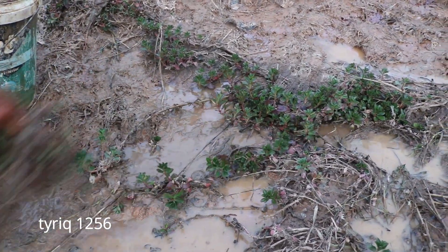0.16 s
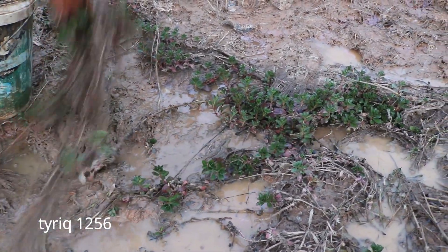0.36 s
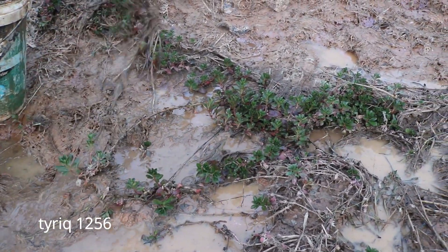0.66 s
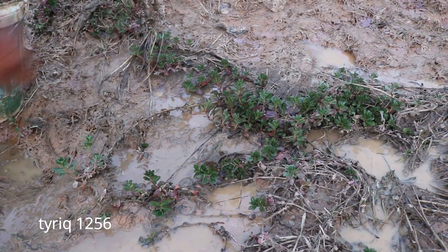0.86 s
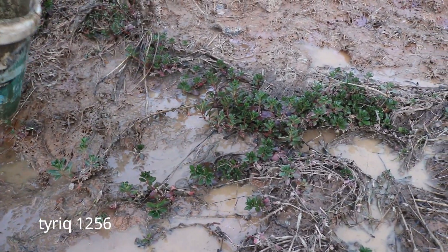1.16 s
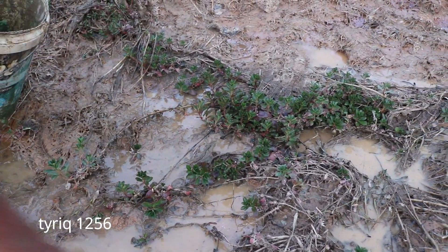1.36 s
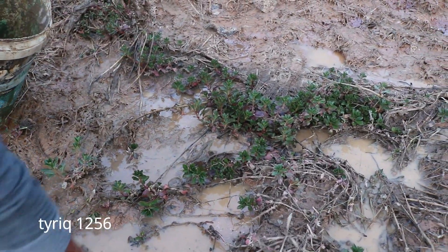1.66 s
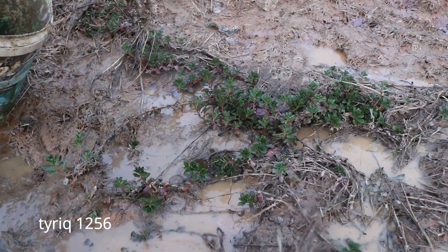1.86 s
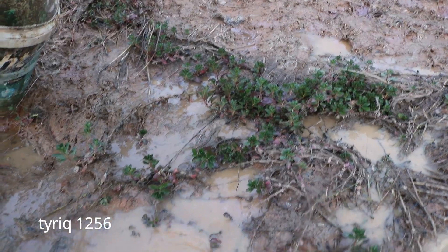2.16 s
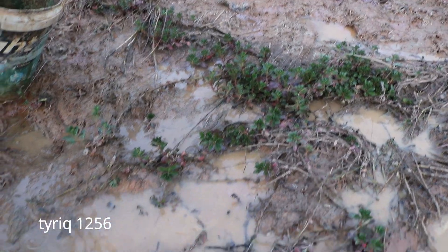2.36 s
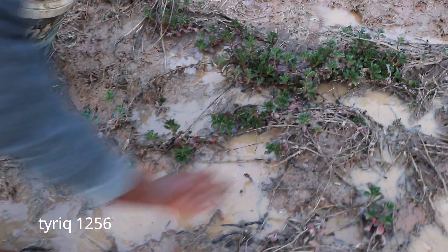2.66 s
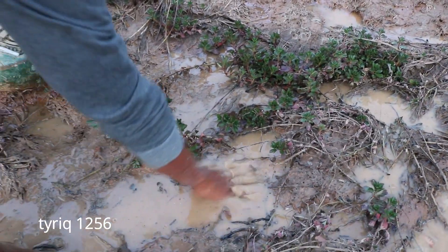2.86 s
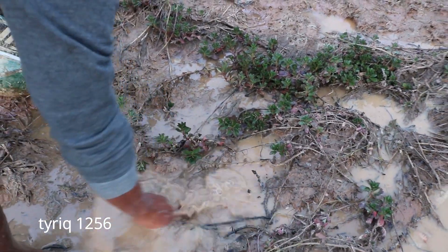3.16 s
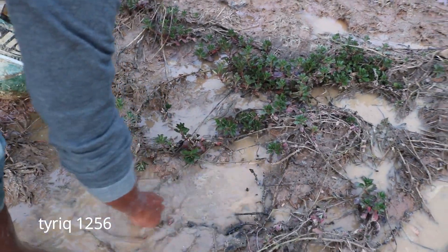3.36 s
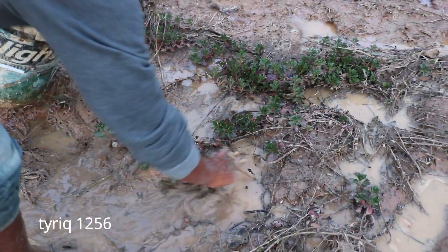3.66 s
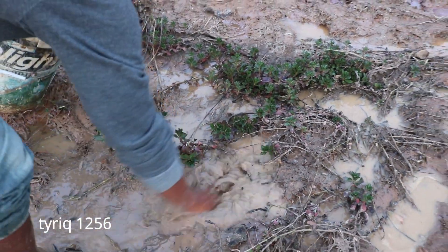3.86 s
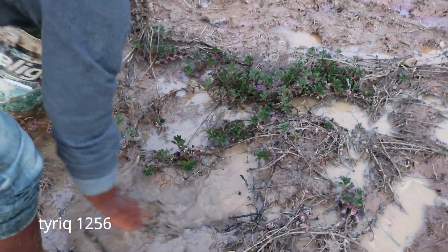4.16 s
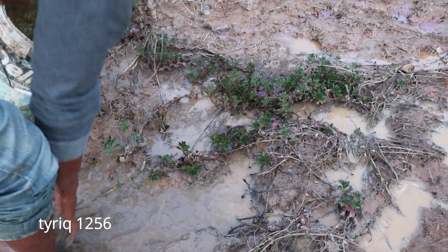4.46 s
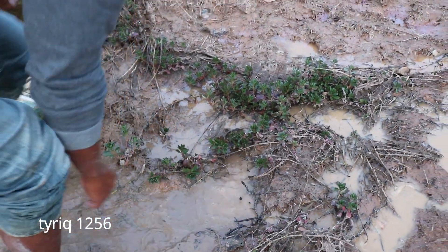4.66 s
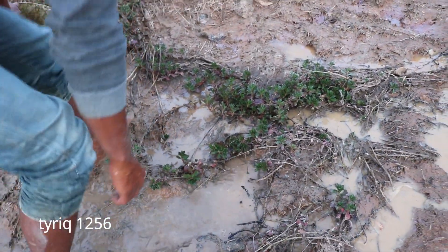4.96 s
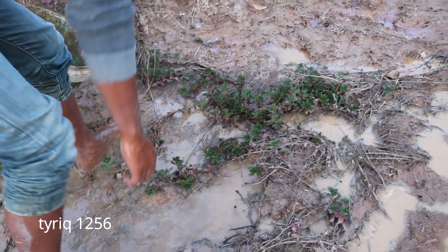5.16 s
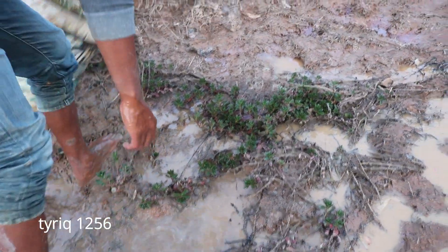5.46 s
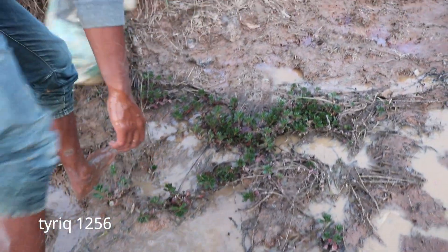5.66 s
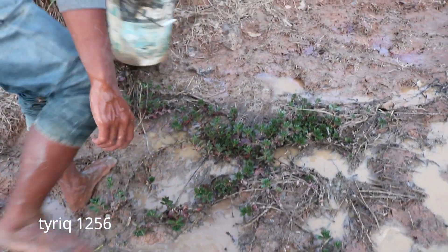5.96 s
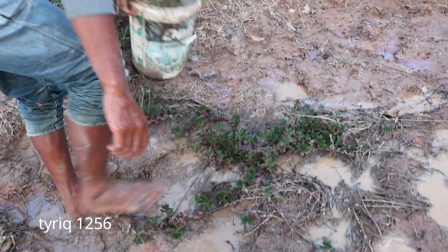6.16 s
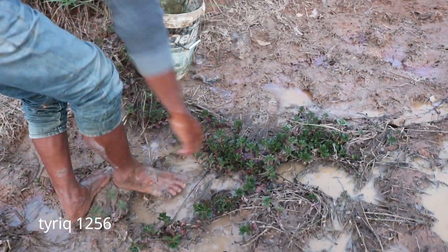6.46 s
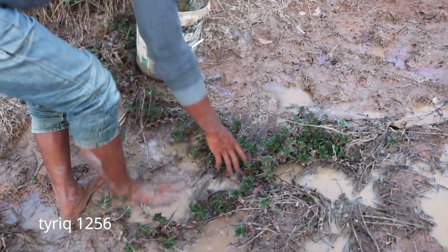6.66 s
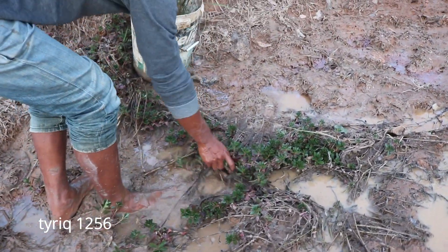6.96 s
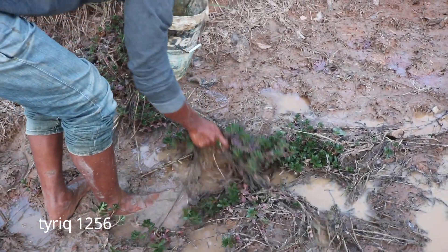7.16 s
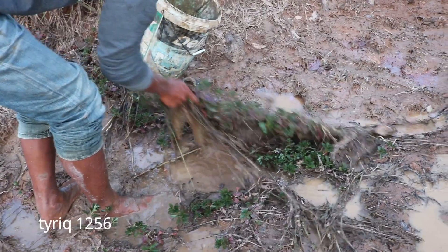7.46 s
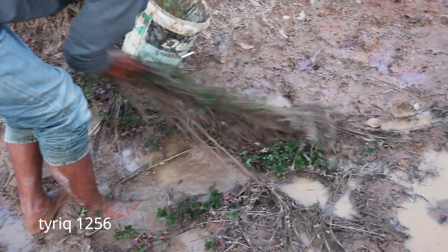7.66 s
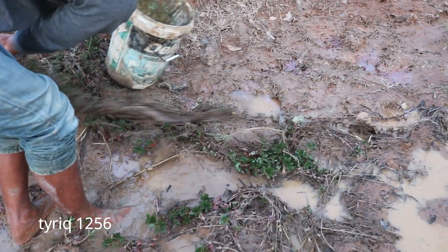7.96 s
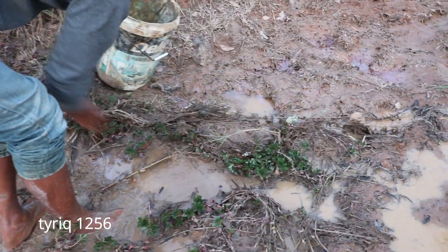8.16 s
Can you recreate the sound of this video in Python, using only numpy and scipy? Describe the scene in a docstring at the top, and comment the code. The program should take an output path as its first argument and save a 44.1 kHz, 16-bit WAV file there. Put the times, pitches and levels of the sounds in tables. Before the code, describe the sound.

Close muddy weed-pulling: rustling stems, sharp snaps, watery swishing and plops, a brief plastic bucket knock, faint distant birds and insect.

```python
"""In a muddy field someone pulls clumps of weeds, rinses a hand in a puddle and steps barefoot through the mud.
Stems rustle and snap, wet clumps slap down and water sloshes: swarms of tiny rings, and filtered noise for frays.
Bubbles are single short rings, often rising in pitch; a plastic bucket, knocked three times in quick succession,
is a sum of fading tones. A light breeze of low noise bumps the microphone.
Two birds (fluttering tones) and an insect (pulsed narrow noise) call far away."""
import sys
import numpy as np
from scipy import signal
from scipy.fft import rfft, irfft, next_fast_len
from scipy.io import wavfile
from scipy.ndimage import uniform_filter1d

SR = 44100
rng = np.random.default_rng(int(sys.argv[2]) if len(sys.argv) > 2 else 0)


def file_out(sig):
    """Save sig as 16-bit WAV at sys.argv[1]."""
    # one column per channel
    cols = np.atleast_2d(sig).T
    # limit, then scale
    lim = np.clip(cols, -1, 1)
    pcm = np.round(lim * 32767).astype(np.int16)
    wavfile.write(sys.argv[1], SR, pcm)


N = 366030
TIME = np.arange(N) / SR  # [s]

# slaps of wet weeds, strokes of the hand in the puddle and steps in mud:
# (time [s], rise [s], fall [s], level [dB], wetness [0 = damp weeds, 1 = open puddle])
SPLASH_EVENTS = [(0, 0.014, 0.03, -30, 0.3), (.051, 0.0052, 0.041, -40.5, 0.034),
                 (0.344, 0.0016, 0.017, -37, 0.039), (.514, 0.0037, 0.039, -43.5, 0.43),
                 (.81, 0.037, 0.035, -42, 0.77), (1.035, 0.01, .03, -37, 0.13),
                 (1.068, 0.0039, 0.074, -41, 0.55), (1.666, 0.0067, 0.034, -41, 0.86),
                 (1.7, .003, 0.04, -43.5, 0.75), (2.058, .002, 0.016, -36, 0.55),
                 (2.448, 0.025, 0.027, -41, 0.2), (2.511, 0.054, 0.0098, -34, 0.12),
                 (2.91, 0.0045, 0.062, -35.5, 0.94), (2.974, 0.036, 0.059, -36, 0.84),
                 (3.06, 0.012, 0.052, -41.5, 0.52), (3.17, 0.012, 0.065, -47, 0.7),
                 (3.232, 0.0041, 0.14, -53, 0.46), (3.533, .015, 0.099, -36.5, 0.97),
                 (3.631, 0.0076, 0.057, -47.5, 0.45), (3.715, 0.056, .09, -33.5, 0.76),
                 (3.831, 0.099, 0.096, -40.5, 0.65), (3.96, 0.057, 0.14, -38, 1),
                 (4.138, 0.018, 0.04, -45.5, 0.73), (4.214, 0.0042, .1, -54, 0.58),
                 (4.342, 0.014, 0.12, -46.5, 0.8), (4.515, 0.0022, 0.058, -43.5, 0.24),
                 (4.563, .021, 0.048, -34, 0.2), (4.639, 0.0082, 0.2, -50.5, 0.57),
                 (4.927, 0.0046, 0.023, -32, 0.47), (4.94, 0.0051, 0.074, -42, 0.82),
                 (5.111, 0.051, 0.029, -44, 0.95), (6.09, .11, 0.048, -45, 0.91),
                 (6.28, 0.039, 0.21, -54.5, 0.89), (6.376, .026, 0.014, -29.5, 0.49),
                 (6.659, 0.07, .25, -50, 0.9), (7.766, 0.026, 0.019, -37.5, 0.74),
                 (7.96, 0.017, 0.017, -37.5, 0.57), (8.231, 0.0043, 0.044, -35, 0.25),
                 (8.261, 0.014, .012, -29, 0.07)]
# dragging weeds, one list a pull: (time [s], base level [dB])
WEED_PULLS = [
    [(.1, -57.5), (.31, -42.5), (.45, -36), (.66, -46.5), (.774, -38.5), (1.0, -57.5)],
    [(1.55, -54), (1.858, -45.5), (2.008, -39.5), (2.176, -46.5), (2.38, -57.5), (2.45, -41)],
    [(6.5, -54), (7.37, -43), (7.58, -40), (7.76, -37), (7.85, -40.5), (8.0, -41), (8.22, -78)],
]
# where each pull is heard: (side [0 = straight ahead, positive = left])
WEED_PULL_SIDES = [0.95, -0.3, -0.27]
# how alike left and right are in the open field: (frequency [Hz], coherence [0 to 1])
FIELD_LIKENESS = [(100, 0.94), (800, 0.5), (2200, 0.33), (4500, 0.14), (9000, 0.028), (16000, 0.036)]
# sounds close by are mostly more alike in both ports: (frequency [Hz], coherence [0 to 1])
NEAR_LIKENESS = [(100, 1), (700, 0.96), (1300, 1), (2400, 0.62), (4500, 0.74), (9000, 0.18), (16000, 0.061)]


def amp(db):
    """Decibels to gain."""
    return 10 ** (np.asarray(db) / 20)


def unit(x):
    """Scales a sound to an average strength (rms) of 1."""
    return x / np.sqrt(np.mean(x ** 2) + 1e-20)


def read(points, hz):
    """Reads a table between its points, on a log-frequency axis."""
    f, value = np.transpose(points)
    return np.interp(np.log(hz + 1), np.log(f + 1), value)


def add(mix, s, sound):
    """Mixes a stereo sound in at time s."""
    start = max(round(s * SR), 0)
    part = mix[:, start:][:, :sound.shape[1]]
    part += sound[:, :part.shape[1]]


def shape(x, response):
    """Filters a sound by a function of frequency."""
    size = next_fast_len(x.shape[-1] + 512)
    spectrum = rfft(x, size) * response(np.fft.rfftfreq(size, 1 / SR))
    return irfft(spectrum, size)[..., :x.shape[-1]]


def colour(x, points):
    """Filters x by a table of (frequency [Hz], level [dB]) and scales it to rms 1."""
    return unit(shape(x, lambda hz: amp(read(points, hz))))


def spread(pair, likeness=FIELD_LIKENESS):
    """Two unrelated signals become one wide source: a shared middle plus a part opposite on each side."""
    angle = lambda hz: np.arccos(np.clip(read(likeness, hz), 0, 1)) / 2
    middle = shape(pair[0], lambda hz: np.cos(angle(hz)))
    sides = shape(pair[1], lambda hz: np.sin(angle(hz)))
    return middle + np.array([[1], [-1]]) * sides


def place(x, side, lead_s=.00008, shadow_db=3):
    """The nearer port hears a source earlier and brighter."""
    ear = np.array([[side], [-side]])

    def path(hz):
        lead = np.exp(2j * np.pi * hz * ear * lead_s)
        return lead * amp(ear * shadow_db * np.minimum(hz / 9000, 1) ** 2)
    return shape(x, path)


def side_at(s):
    """Where the hands and feet are at work at time s."""
    # place of the work: (time [s], side [0 = straight ahead, positive = left])
    work_path = [(0, 1.16), (1.1, 0.8), (1.7, .3), (2.1, 0.23), (2.55, 1.33), (2.9, 0.27), (3.25, -0.38),
                 (3.55, -0.2), (4.1, 0.41), (4.45, 0.23), (4.6, 1.17), (4.93, 0.24), (5.7, 0.55),
                 (6.4, 0.28), (6.7, 0.65), (7.1, -0.52), (7.8, -0.61), (8.25, 1.2)]
    return np.interp(s, *np.transpose(work_path))


def clumps(depth_db, size=400):
    """A gain that flutters every few milliseconds, as droplets and contacts come in bunches."""
    smooth = uniform_filter1d(rng.standard_normal(N), size)
    return amp(depth_db * unit(smooth))


def ring(hz, life, rise):
    """A bubble swells and dies; as it nears the surface its pitch climbs towards about an octave up."""
    t = np.arange(int(4 * life * SR) + 128) / SR
    pitch = hz * (1 + 1.25 * np.tanh(rise * t / 1.1))
    envelope = np.sqrt(t / life) * np.exp(-(t / life) ** 1.5)
    return envelope * np.sin(2 * np.pi * np.cumsum(pitch) / SR)


def grains(per_s, cycles, size_db, count=26, size=N // 3):
    """Two even-spectrum swarms of tiny rings of uneven size, looped; the small high ones are more frequent."""
    out = np.zeros((2, size))
    for hz in np.geomspace(330, 15000, count):
        chance = rng.random((2, size))
        strength = np.minimum(rng.exponential(1, 8192), 4)
        hits = chance < per_s / count * np.sqrt(hz / 3000) / SR
        kicks = amp(size_db * strength) * rng.choice([-1, 1], 8192)
        train = np.zeros((2, size))
        train[hits] = np.resize(kicks, hits.sum())
        life = cycles / hz * min(1, (2500 / hz) ** 0.35)
        grain = ring(hz, life, 0.086 / life)
        rings = signal.oaconvolve(train, grain[None], axes=1)[:, :size]
        out += np.sqrt(hz) * unit(rings)
    return unit(out)[:, np.arange(N) % size]


def splashes(fall_db=13, foot=0.56, bunch_db=2.6):
    """Each splash is a burst of droplets: open water gurgles with bubbles, wet weeds and mud crackle."""
    # more water means more low gurgle: (level on damp weeds [dB], level in the open puddle [dB])
    gurgle_range = (-35, 5)
    # and less bright spray: (level on damp weeds [dB], level in the open puddle [dB])
    spray_range = (-2.5, -16)
    water = spread(grains(per_s=2000, cycles=3.5, size_db=4.5), NEAR_LIKENESS)
    crackle = spread(grains(per_s=7000, cycles=1.5, size_db=4.5), NEAR_LIKENESS)
    water = water * clumps(bunch_db)
    out = np.zeros((2, N))
    for s, rise, fall, db, wetness in SPLASH_EVENTS:
        t = np.arange(int((rise + 2 * fall) * SR)) / SR
        at = (round(s * SR) + np.arange(len(t))) % N
        gurgle = np.interp(wetness, [0, 1], gurgle_range)
        spray = np.interp(wetness, [0, 1], spray_range)
        wet = np.clip(wetness, .05, .95) ** 0.86
        growing = foot + (1 - foot) * (t / rise) ** 2
        fading = amp(-fall_db * (t - rise) / fall)
        swell = np.where(t < rise, growing, fading)
        body = max(gurgle, -13)
        tone = [(130, body - 16), (380, body - 11), (600, body), (1400, body / 2 + 2),
                (2600, 0), (5000, spray / 2 - 1), (8000, spray), (15500, spray - 10)]
        droplets = np.sqrt(wet) * water[:, at] + np.sqrt(1 - wet) * crackle[:, at]
        burst = colour(droplets, tone) * swell
        stretch = np.sqrt(len(t) / SR / (rise + fall))  # makes up for the quiet tail
        add(out, s, place(unit(burst) * amp(db) * stretch, side_at(s)))
    return out


def rustle(level_db=2, flutter_db=1.76):
    """Countless leaf and stem contacts, in uneven clumps, as the weeds are dragged."""
    # tone of the leaves: (frequency [Hz], level [dB])
    leaf_tone = [(290, -66), (500, -12), (740, -10.5), (1670, -2), (1820, -0.5), (1980, -7.5), (2160, -2),
                 (6230, -3), (12000, -8.5), (14900, -10.5), (16000, -29)]
    contacts = grains(per_s=16000, cycles=1.3, size_db=4.4)
    swarm = colour(spread(contacts), leaf_tone)
    swarm = unit(swarm * clumps(flutter_db))
    out = np.zeros((2, N))
    for pull, side in zip(WEED_PULLS, WEED_PULL_SIDES):
        s, db = np.transpose(pull)
        during = (TIME >= s[0]) & (TIME <= s[-1])
        effort = amp(np.interp(TIME[during], s, db) + level_db)
        effort = effort * signal.windows.tukey(during.sum(), .06)  # soft start and end
        add(out, s[0], place(swarm[:, during] * effort, side))
    return out


def fibres(per_s=95, over_db=8, size_db=6.5):
    """Single roots and stems give way while a clump is dragged; the harder the pull, the louder."""
    out = np.zeros((2, N))
    for pull, side in zip(WEED_PULLS, WEED_PULL_SIDES):
        s, db = np.transpose(pull)
        length = s[-1] - s[0]
        for when, pitch, size, stray in rng.random((300, 4))[:int(per_s * length)]:
            at = s[0] + when * length
            hz = 2300 * 4 ** pitch
            level = np.interp(at, s, db) + over_db + size_db * min(-np.log(size), 3)
            tick = amp(level) * ring(hz, 1.7 / hz, 0)
            add(out, at, place(tick, side + stray - .5))
    return out


def snaps(crack_s=0.00028, fray_level=0.45, fray_s=0.0015, octaves=0.22):
    """A sharp crack, then a short fray of fibres."""
    # the loudest stems snapping and drops ticking: (time [s], level [dB], centre [Hz])
    snap_events = [(0.0157, -17.5, 5350), (.858, -23.5, 4530), (0.986, -35, 7600), (1.053, -24.5, 4530),
                   (1.3842, -38.5, 5640), (2.0603, -24, 3020), (2.338, -40, 7980), (2.3497, -36.5, 6800),
                   (2.465, -20.5, 4500), (2.47, -26, 5730), (3.0344, -24.5, 5700), (3.0613, -24.5, 4100),
                   (3.1494, -28, 7850), (3.384, -37, 3350), (4.5805, -21.3, 4860), (5.6377, -33.5, 7500),
                   (5.6904, -32, 3200), (5.743, -35, 6840), (6.1979, -32.5, 1390), (6.357, -38.5, 7200),
                   (6.5529, -28, 2600), (7.1995, -20.5, 3500), (7.7247, -29.5, 6220), (7.784, -25, 6230),
                   (7.894, -32, 6550), (8.248, -27, 3520), (8.2725, -18, 3830)]
    out = np.zeros((2, N))
    t = np.arange(600) / SR
    for s, db, hz in snap_events:
        crack = np.exp(-t / crack_s) * np.sin(2 * np.pi * hz * t)
        hiss = rng.standard_normal((2, len(t)))
        fray = unit(shape(hiss, lambda f: 1 / (1 + (np.log2((f + 1) / hz) / octaves / 2) ** 2)))
        snap = crack + fray_level * fray * np.exp(-t / fray_s)
        start_strength = snap[:, :110].std()
        add(out, s, place(amp(db) * snap / start_strength, side_at(s)))
    return out


def bubbles():
    """The larger bubbles, each a pop or a plop, many of them rising in pitch."""
    # larger air pockets ringing in water and mud:
    # (time [s], level [dB], starting pitch [Hz], life [s], relative pitch rise [about 1/s])
    air_pockets = [(0.0107, -9, 2050, 0.00087, 0), (0.0968, -24.5, 1430, 0.0035, 41),
                   (.125, -22.5, 3400, .0017, 0), (0.27, -13, 2670, 0.0029, 25),
                   (.8181, -27.5, 730, 0.0058, 3), (1.0434, -6, 2900, 0.0013, -2),
                   (1.0886, -14, 3180, 0.0023, 4), (1.1895, -14.5, 874, 0.01, 67),
                   (1.6577, -8.5, 3060, 0.00066, 0), (1.6665, -18.5, 1200, 0.0042, -8),
                   (2.1271, -24.5, 1140, 0.0072, 25), (2.9163, -5.5, 2660, 0.0012, 18),
                   (2.979, -9.5, 2850, .001, 0), (2.993, -20, 1355, 0.013, 45),
                   (3.0263, -24, 533, 0.0061, 1), (3.185, -25.5, 3100, 0.0018, 39),
                   (3.236, -15, 1590, 0.0013, -2), (3.2638, -16, 1360, .003, 5),
                   (3.557, -17, 1140, .0084, 13), (3.6347, -17.5, 1107, .0087, 15),
                   (3.698, -16.5, 1824, 0.0061, 1), (3.7837, -12.5, 1090, 0.00071, 0),
                   (3.791, -15.5, 1730, .0011, 0), (3.844, -10.5, 3020, 0.0012, -3),
                   (3.9328, -2.5, 4714, 0.00092, 0), (4.007, -18, 370, 0.0082, 27),
                   (4.0173, -10, 2250, 0.00063, 28), (4.0596, -20, 1274, 0.0087, 7),
                   (4.0684, -20.5, 735, 0.0043, 21), (4.1377, -25.5, 770, 0.0052, -4),
                   (4.177, -15.5, 3060, 0.0015, 45), (4.2188, -26.5, 1170, 0.0059, 13),
                   (4.3014, -19, 1700, 0.00096, 35), (4.3679, -33, 489, 0.026, 25),
                   (4.422, -26.5, 1490, 0.0026, 47), (4.4504, -27, 1990, 0.0018, 0),
                   (4.5185, -18, 1630, 0.0076, 29), (4.663, -23.8, 2010, 0.0022, 8),
                   (6.296, -35.5, 612, 0.027, 4), (6.686, -10, 2200, 0.0014, 61),
                   (6.7362, -25, 2280, 0.0026, 0), (6.7787, -31, 1240, 0.0053, -1),
                   (6.9307, -22.5, 1160, 0.0012, 48), (7.008, -20, 1210, 0.0049, 65),
                   (7.797, -9, 3940, .002, 0)]
    out = np.zeros((2, N))
    for s, db, hz, life, rise in air_pockets:
        add(out, s, place(amp(db) * ring(hz, life, rise), side_at(s)))
    return out


def plops(per_s=120, over_db=10.5, fade_db=5, uneven_db=8, life_cycles=3.9,
          lowest_hz=720, octaves=2.34, rise_per_s=35):
    """Splashes in open water leave stray bubbles that ring out on their own; the late ones tend to be weaker."""
    out = np.zeros((2, N))
    for s, rise, fall, db, wetness in SPLASH_EVENTS:
        draws = rng.random((48, 4))
        if wetness > .52:
            for when, pitch, size, climb in draws[:int(per_s * (rise + fall))]:
                hz = lowest_hz * 2 ** (octaves * pitch)
                level = db + over_db - fade_db * when - uneven_db * size
                plop = amp(level) * ring(hz, life_cycles / hz, rise_per_s * climb)
                add(out, s + when * (rise + 1.3 * fall), place(plop, side_at(s)))
    return out


def settling(per_s=28, db=-48, size_db=6.5, side=0.16):
    """Trodden mud ticks faintly as tiny bubbles burst."""
    out = np.zeros((2, N))
    for when, pitch, size, stray in rng.random((int(per_s * N / SR), 4)):
        hz = 2500 * 5 ** pitch
        tick = amp(db + size_db * min(-np.log(size), 3)) * ring(hz, 4 / hz, 20)
        add(out, when * N / SR, place(tick, side + stray - .5))
    return out


def bucket(side=0.51, scuff_db=-4, scuff_s=0.0052):
    """Blows ring the plastic wall, with a gritty scuff."""
    # blows on the bucket: (time [s], level [dB])
    blows = [(5.156, -34.5), (5.2, -27), (5.213, -26.5)]
    # ringing tones of its wall: (frequency [Hz], level [dB], time to fade by 60 dB [s])
    wall_modes = [(299, -15, 0.15), (410, -13, 0.088), (786, -3.5, 0.095), (894, -1, 0.028),
                  (1340, -3, 0.054), (1427, -5, 0.087), (1910, -12, .08), (2220, -9, 0.076),
                  (2250, -12, 0.043), (3270, -9, .04)]
    scuff_tone = [(200, 4.5), (2000, 2), (6000, -3.5), (15000, -24)]  # (frequency [Hz], level [dB])
    out = np.zeros((2, N))
    t = np.arange(9000) / SR
    for s, db in blows:
        wall = sum(amp(level - 60 * t / t60) * np.sin(2 * np.pi * (hz * t + rng.random()))
                   for hz, level, t60 in wall_modes)
        grit = colour(rng.standard_normal((2, len(t))), scuff_tone)
        scuff = grit * amp(scuff_db) * np.exp(-t / scuff_s)
        add(out, s, place(amp(db) * (wall + scuff), side))
    return out


def surroundings(x, near_db, far_db, near_s=0.0035, far_s=0.016):
    """Quick reflections from ground and body, and a faint scatter from the field."""
    t = np.arange(8000) / SR
    sparse = rng.standard_normal((2, 2, len(t))) * (rng.random((2, 2, len(t))) < .25)
    near, far = sparse * (t > .0007)
    echo = amp(near_db) * unit(near * np.exp(-t / near_s))
    echo = echo + amp(far_db) * unit(far * np.exp(-t / far_s))
    echo = spread(echo, NEAR_LIKENESS) / np.sqrt(len(t))
    return x + signal.oaconvolve(x, echo, axes=1)[:, :N]


def breeze(left_db=-15, right_db=3, bump_db=3, lumps_db=4.0, margin_s=0.057, skew=0.7, calm_db=-59.5):
    """Puffs of lumpy eddies swell and die away, buffeting mainly the right port."""
    # puffs of breeze on the microphone: (time [s], length before margins [s], base level [dB])
    puffs = [(0.52, 0.32, -34), (2.12, 0.074, -48), (2.81, 0.23, -37.5), (3.115, 0.034, -42),
             (3.603, 0.39, -28), (4.23, 0.15, -49), (4.545, 0.11, -41.5), (6.124, 0.24, -44),
             (7.028, 0.27, -38.5), (7.613, 0.95, -36)]
    # dull bumps on the microphone: (time [s], base level [dB], pitch [Hz])
    dull_bumps = [(.668, -10, 96.5), (0.741, -7.5, 108), (3.638, -8.5, 130), (3.778, -4.5, 126),
                  (4.674, -14.5, 166), (6.243, -18, 145), (7.113, -16, 71.4)]
    # tone of the buffeting: (frequency [Hz], level [dB])
    buffet_tone = [(12, -49), (20, -12), (83, 0), (102, 0.5), (184, -9), (248, -11.5), (278, -16),
                   (400, -27.5), (520, -78), (880, -120)]
    lump_tone = [(5, -3), (15, -3.5), (35, -18.0), (70, -28), (300, -120)]  # (frequency [Hz], level [dB])
    force = np.full(N, amp(calm_db))
    for s, length, db in puffs:
        # an arch that starts early, ends late and peaks before its middle
        u = np.clip((TIME - s + margin_s) / (length + 2 * margin_s), 0, 1)
        force = force + amp(db) * np.sin(np.pi * u ** skew) ** 2
    lumps = amp(lumps_db * colour(rng.standard_normal(N), lump_tone))
    eddies = colour(rng.standard_normal((2, N)), buffet_tone)
    out = unit(eddies * lumps) * force
    for s, db, hz in dull_bumps:
        bump = np.tile(ring(hz, 0.58 / hz, 0), (2, 1))
        add(out, s, amp(db - bump_db) * bump)
    return out * amp([[left_db], [right_db]])


def far_calls(rows, length, glide, overtone_db, echo_s=0.02):
    """Thin, arched, fluttering bird notes, smeared by echoes on their long way."""
    out = np.zeros((2, N))
    t = np.arange(int(length * SR)) / SR
    u = t / length
    late = np.arange(5000) / SR
    for s, hz, db in rows:
        flutter = .035 * np.sin(2 * np.pi * (70 * t + rng.random()))
        arch = 0.033 * np.sin(np.pi * u) - .025
        pitch = hz * (1 + glide * (u - .5) + arch + flutter)
        phase = 2 * np.pi * np.cumsum(pitch) / SR
        note = np.sin(np.pi * u) * (np.sin(phase) + amp(overtone_db) * np.sin(2 * phase))
        paths = unit(rng.standard_normal((2, len(late))) * np.exp(-late / echo_s)) / np.sqrt(len(late))
        add(out, s, amp(db) * signal.fftconvolve(note[None], paths, axes=1))
    return out


def song(count=8, start_s=5.56, every_s=.207, note_hz=2990, stray_hz=45, note_db=-44):
    """A far bird repeats one note at an even pace, its pitch straying a little: (time [s], pitch [Hz], level [dB])."""
    return [(start_s + k * every_s, note_hz + stray_hz * rng.uniform(-1.03, 1), note_db)
            for k in range(count)]


def insect(hz=7330, width_hz=170):
    """Short trains of wing strokes, ten trains a second, cut from a narrow band of noise."""
    # how strongly the insect carries: (time [s], level [dB])
    carry = [(0, -62), (1.3, -60), (1.8, -62), (3.4, -57), (4.8, -51), (5.5, -50), (5.9, -52.5), (6.5, -51),
             (7.2, -65), (8.3, -51)]
    whine = unit(shape(rng.standard_normal((2, N)), lambda f: np.exp(-((f - hz) / width_hz) ** 2 / 2)))
    trains = np.clip(2 * np.cos(2 * np.pi * 10 * (TIME - 5.243)) - .3, 0, 1)
    strokes = .7 + .3 * np.cos(2 * np.pi * 101 * TIME)
    return amp(np.interp(TIME, *np.transpose(carry))) * whine * trains * strokes


def field_air(level_db=-48):
    """The quiet of the field: steady, wide, filtered noise."""
    # tone of the open air: (frequency [Hz], level [dB])
    air_tone = [(15, -36), (25, 3), (58, -2), (263, -6.5), (545, -11), (796, -9), (1650, -12), (1890, -9.5),
                (2350, -12), (3820, -13.5), (4740, -15), (7310, -18), (8360, -19), (11300, -24.5),
                (16000, -29)]
    return amp(level_db) * colour(spread(rng.standard_normal((2, N))), air_tone)


def scene():
    """The work in the mud over the quiet of the field."""
    # short peeps of a second bird: (time [s], pitch [Hz], level [dB])
    peep_notes = [(1.21, 1874, -36), (1.41, 1904, -41), (2.63, 1880, -42), (2.82, 1820, -39.5)]
    pops = bubbles() + snaps() + bucket() + settling() + plops() + fibres()
    pops = surroundings(pops, near_db=-1, far_db=-14.0)
    wash = surroundings(splashes() + rustle(), near_db=-22, far_db=-24)
    singer = far_calls(song(), length=0.094, glide=-0.0955, overtone_db=-39)
    peeper = far_calls(peep_notes, length=0.017, glide=0.017, overtone_db=-1.5)
    return pops + wash + singer + peeper + insect() + field_air() + breeze()


def record(dry, edge_hz=15950, bass_hz=33):
    """The two ports differ a little in colour and lose the deepest bass; then the top treble is cut off."""
    # (frequency [Hz], level added on the left and taken off the right [dB])
    balance = [(500, 0.3), (1100, 0.38), (2200, -1.3), (4500, 0.76), (9000, 1.0), (15000, 1.0)]

    def port(hz):
        tilt = amp(np.array([[1], [-1]]) * read(balance, hz))
        return tilt * hz ** 4 / (hz ** 4 + bass_hz ** 4)
    ports = shape(dry, port)
    treble_cut = signal.firwin(511, edge_hz, window=("kaiser", 9), fs=SR)
    return signal.oaconvolve(ports, treble_cut[None], "same")


dry = scene()
out = record(dry)
file_out(out)
```